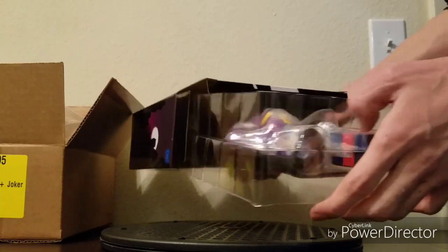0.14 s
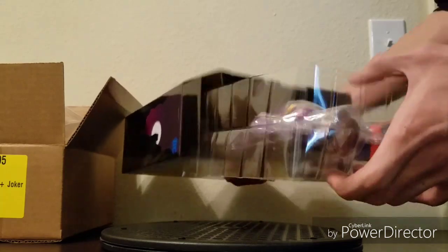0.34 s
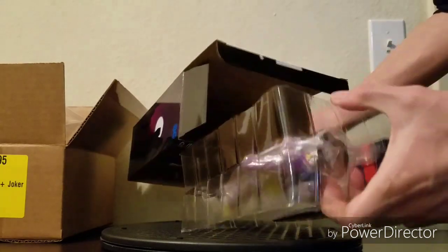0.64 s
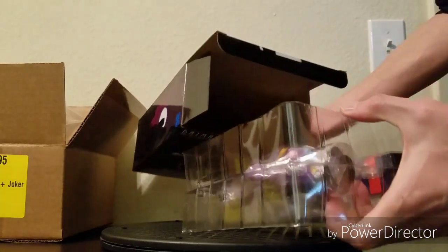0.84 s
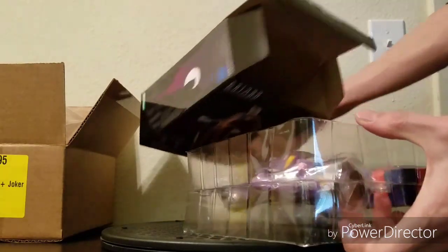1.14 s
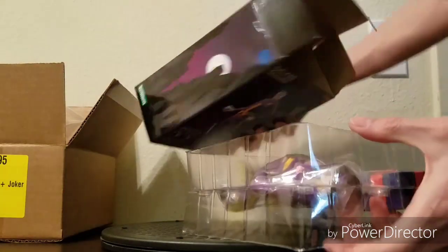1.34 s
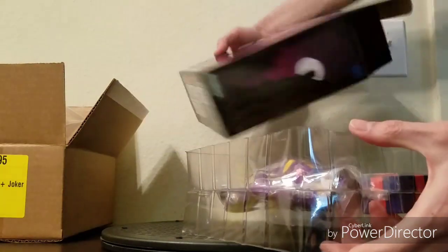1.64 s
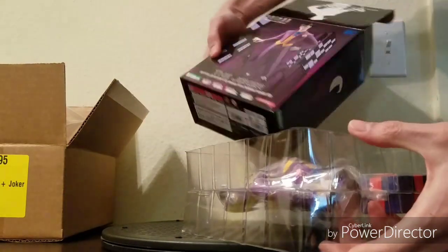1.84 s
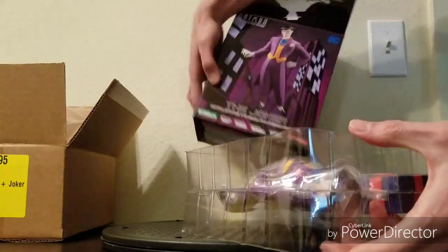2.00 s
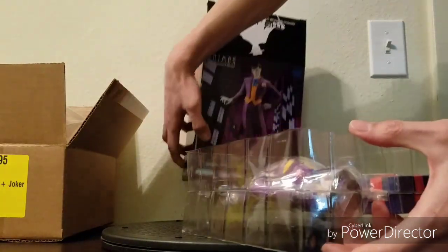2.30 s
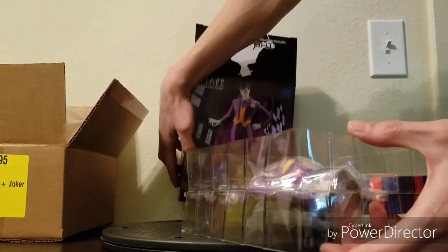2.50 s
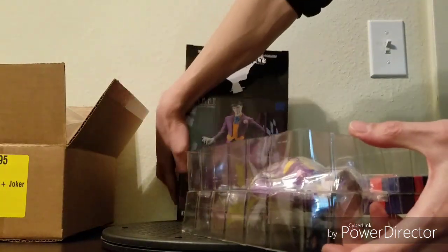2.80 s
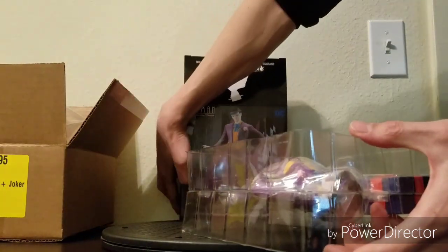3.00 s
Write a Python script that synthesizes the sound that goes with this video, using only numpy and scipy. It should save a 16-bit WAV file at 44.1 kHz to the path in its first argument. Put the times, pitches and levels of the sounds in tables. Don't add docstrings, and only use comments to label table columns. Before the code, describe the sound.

A thin plastic tray slides from a cardboard box, scraping with a low hollow boom and scattered snaps from 0 s, a loud pop near 0.34, and a dense crackling rush at 0.43-0.8. Faint creaks and hand rubs follow, with single ringing pops at 1.25, 1.63, 1.79 and 2.02. Hollow cardboard knocks land around 2.43, 2.73 and 2.96. Close microphone, short room echo, quiet hum.

```python
import sys
import numpy as np
from scipy import signal
from scipy.fft import rfft, irfft, next_fast_len
from scipy.io import wavfile
from scipy.ndimage import uniform_filter1d, map_coordinates

SR = 44100
rng = np.random.default_rng(int(sys.argv[2]) if len(sys.argv) > 2 else 0)


def log_audio(samples):
    frames = np.atleast_2d(samples).T
    limited = np.clip(frames, -1, 1)
    pcm = np.round(limited * 32767).astype(np.int16)
    wavfile.write(sys.argv[1], SR, pcm)


def makeup_ratio(level_db):
    decades = np.asarray(level_db, float) / 20
    return 10 ** decades


N = 138915

# (frequency [Hz], level [dB])
HUM_COLOUR = [(15, -18.5), (25, -20), (49, -4.5), (124, 7), (202, -3), (566, -9.5), (9000, -30.5),
              (14700, -23), (16400, -46.5)]
# (frequency [Hz], time to fall 60 dB [s])
ROOM_T60 = [(100, 0.23), (600, 0.31), (3000, 0.31), (14000, 0.29)]
# (frequency [Hz], width [Hz], level [dB])
NOOK_MODES = [(1596, 46, 3), (135, 24, 6)]
# (frequency [Hz], left over right [dB])
LEFT_OVER_RIGHT = [(25, 8), (400, 1.6), (3000, -2.2), (5500, -6), (9000, 3), (15000, 3.2)]
# (frequency [Hz], unlike part [dB])
UNLIKE_PART = [(60, -22.5), (500, -20), (2000, -16), (6000, -7), (15000, -8.5)]
# (middle [s], half length [s], level [dB], bright over dull [dB])
HAND_RUBS = [
    (1.009, 0.16, -66.5, 6.5),
    (1.111, 0.044, -61, 8),
    (1.439, 0.014, -54.5, 5),
    (2.256, 0.03, -54.5, -0.5),
    (2.612, 0.0273, -75, 12),
    (3.1, 0.14, -59.5, 0),
]
# (time [s], scrape level [dB])
SCRAPE_LEVEL = [(0, -31.5), (0.088, -35.5), (0.189, -30), (.26, -34.5), (0.324, -38.5), (.35, -29.5),
                (0.419, -31.5), (0.461, -27.5), (0.522, -33), (.57, -25.5), (.6, -30.5), (.65, -42.5),
                (.7, -39), (0.755, -44.5), (0.812, -38.5), (.88, -90)]
# (frequency [Hz], level [dB per Hz])
SCRAPE_COLOUR = [(40, -25.5), (300, 2.5), (600, 3), (2500, -7), (3300, -13.5), (7500, -21.5), (9000, -28),
                 (13500, -26)]
# (time [s], peak [dB], ring [Hz])
BOX_KNOCKS = [(0.346, -20.5, 135), (0.383, -30, 128), (.437, -18.5, 130.7), (.46, -23.5, 138.4),
              (0.488, -36, 81), (0.252, -37, 120), (.72, -42.5, 61), (0.612, -28, 135), (1.172, -41, 310),
              (1.503, -58.5, 125), (2.206, -45.5, 500), (2.218, -36.5, 398), (2.247, -37, 501),
              (2.258, -43, 674), (2.424, -25, 434), (2.428, -28, 251), (2.44, -30.5, 206),
              (2.572, -47, 582), (2.6, -46.5, 475), (2.727, -19.5, 533), (2.731, -33, 131),
              (2.743, -26.5, 516), (2.953, -31.5, 508), (2.961, -21.5, 221), (2.992, -26, 666),
              (3.134, -45, 392)]
# (frequency [Hz], mode strength [dB])
BOX_BODY = [(47, -40), (80, -15), (211, -8.5), (509, -4.5), (1470, -21.5), (2700, -30), (3000, -42),
            (3900, -58.5), (6600, -120)]
# (frequency [Hz], mode strength [dB])
TRAY_BODY = [(88, -45), (190, -14.5), (300, -6.5), (680, -4.5), (824, -10.5), (932, -8.5), (4000, -12),
             (5200, -59.5), (8800, -120)]
# (frequency [Hz], level [dB per Hz])
CRACK_COLOUR = [(1500, -3.5), (2500, 3), (3200, -16.5), (4400, -10), (7500, -13.5), (9500, -24),
                (13000, -20), (16400, -30.5)]
# (time [s], peak [dB], ring [Hz], crack over ring [dB], buckling time [ms])
RUSH_SNAPS = [(0.091, -27.5, 1010, -18.5, 2.7), (.129, -24.5, 1070, -14.5, 0.83),
              (0.237, -16.5, 1052, -6.5, 2.9), (0.285, -28, 1500, -13, 4.1), (0.337, -23, 2120, -7.5, 6.7),
              (0.43, -14, 757, -25, 2.3), (0.444, -14.5, 525, -29.5, 3.83), (0.462, -15, 493, -11.5, 4.3),
              (0.48, -17.5, 810, -18, 6.5), (.487, -13.5, 855, -17, 3.6), (0.492, -12, 1815, -11, 6.8),
              (.508, -24.5, 770, -12.5, 3.6), (0.528, -16, 2290, -6.5, 2.24), (0.53, -9, 1780, -13, 7),
              (.547, -25, 800, -20, 2.8), (0.557, -16, 1330, -24, 4), (.568, -10.5, 570, -29, 4.54),
              (0.578, -15.5, 590, -24, 3), (.588, -19, 1200, -23, 4.4), (0.603, -8.5, 1040, -21.5, 4.6),
              (0.612, -7, 556, -18, 3), (0.619, -11, 1653, -8.5, 6), (0.634, -22.5, 2400, -24, 3.6),
              (0.646, -16.5, 2500, -24.5, 3.3), (0.656, -21.5, 2370, -21, 4), (0.667, -10, 882, -16, 4),
              (.677, -24.5, 1000, -13.5, 2.6), (0.703, -35.5, 810, -15, 0.68),
              (0.714, -23.5, 2070, -19.5, 1.93), (0.732, -23, 1076, -17.5, 2.5),
              (0.768, -26.5, 1930, -14, 1.3), (0.775, -20.5, 329, -13.5, 1.66),
              (0.783, -17, 1070, -20, 2.8), (0.804, -19.5, 997, -14, 2.86)]
# (time [s], peak [dB], ring [Hz], crack over ring [dB])
SETTLING_SNAPS = [(0.922, -31.5, 296, -3.5), (0.992, -30.5, 783, -6.5), (1.061, -40, 530, -30),
                  (1.107, -63, 885, -20), (1.167, -40.5, 352, -36), (1.38, -39.5, 797, -15),
                  (1.43, -42, 490, -17), (1.477, -52, 358, -8), (1.545, -30, 836, -21),
                  (2.368, -46.5, 718, -29), (2.53, -63.5, 470, 1), (2.749, -23.5, 1640, -19),
                  (2.736, -29, 2300, -22), (2.95, -31.5, 323, -14), (3.038, -34.5, 444, -13)]
# (time [s], peak [dB], ring [Hz], crack over ring [dB])
CREAKS = [
    (.918, -31.5, 1043, -27),
    (1.236, -42, 780, -31),
    (1.621, -37.5, 756, -32.5),
    (2.009, -38.5, 560, -35),
]
# (time [s], peak [dB], crack over ring [dB])
PANEL_POPS = [
    (.342, -3, -18),
    (.345, -3.5, -32),
    (.437, -8.5, -36),
    (1.253, -17, -12.5),
    (1.632, -11, -19),
    (1.792, -9.5, -16.5),
    (2.017, -11, -19),
]
# (frequency [Hz], level [dB])
PANEL_RINGS = [
    [(390, 7), (554, 8), (1015, -0.5), (1700, 3.5)],
    [(320, 6), (560, 9), (1040, 4.5)],
    [(530, 13.5), (750, 3.5), (1340, 3)],
    [(560, -3.5), (834, 4.5), (1520, 0), (2300, 1.5), (4570, -3), (5400, -6)],
    [(290, 4.5), (813, 8.5), (1760, 9.5), (2080, 2), (2390, 2), (4250, 7)],
    [(275, -1.5), (813, 7), (1400, -2.5), (2070, 2), (2430, -9), (4250, 16), (5300, -11)],
    [(330, -4), (1030, 8.5), (1580, 3.5), (1940, -1.5), (2610, -4), (3310, -4), (4300, 12.5)],
]

SLIPS, SLIP_FADE_DB, RING_LAG_S = 9, 10, .001
MODES_PER_BLOW, LEAD_T60_S = 36, 0.048
TRAY_T60_S, BOX_T60_S = .03, .045
PANEL_BUCKLE_S, SMALL_BUCKLE_S = 0.0035, .002
CRACK_LASTS = 1.89
KNOCK_S, CRISP_KNOCK_S, CRISP_AFTER_S = 0.01291, 0.0051, 2.9
KNOCK_SOFT_S, BOOM_BELOW_HZ = 0.00062, 160
GRAINS_PER_S, GRAIN_SPREAD_DB, GRIT_DB, PATCHY_DB = 700, 4, -1, 4
BOOM_HZ, BOOM_WIDTH_HZ, BOOM_GAIN = 135, 52, 0.99
SCATTER_ABOVE_HZ, SCATTER_DB = 1320, 3
ROOM_DB, ROOM_DELAY_S, HUM_DB = -6.5, .005, -62
TOP_HZ, CEILING, KNEE = 15900, .8, 4


def unit(x):
    return x / np.sqrt(np.mean(x ** 2) + 1e-20)


def along(points, hz):
    f, v = np.transpose(points)
    return np.interp(np.log(hz + 1), np.log(f + 1), v)


def filtered(x, response):
    m = next_fast_len(x.shape[-1] + 8192)
    gain = response(np.fft.rfftfreq(m, 1 / SR))
    return irfft(rfft(x, m) * gain, m)[..., :x.shape[-1]]


def wobble(rate):
    knots = rng.standard_normal(int(N * rate / SR) + 4)
    return map_coordinates(knots, [np.arange(N) * rate / SR])


def resonances(f, modes):
    total = 0
    for k, (hz, width, db) in enumerate(modes):
        drag = 1j * f * width
        total = total + (-1) ** k * makeup_ratio(db) * drag / (hz * hz - f * f + drag)
    return total


def mode_width(hz, t60, power):
    return np.log(1000) / np.pi / t60 * (hz / 500) ** power


def scattered(x, size):
    z = signal.stft(x, nperseg=size)[2]
    turned = z * np.exp(2j * np.pi * rng.random(z.shape))
    return signal.istft(turned, nperseg=size)[1][:N]


def hum():
    noise = rng.standard_normal((2, N))
    middle, side = filtered(noise, lambda f: makeup_ratio(along(HUM_COLOUR, f)) * (f < 16500))
    side = filtered(side, lambda f: makeup_ratio(along([(100, -9.0), (1000, 2.5), (5000, 0.0)], f)))
    level = makeup_ratio(HUM_DB + 0.5 * wobble(6.02))
    return level * unit(np.array([middle + side, middle - side]))


def room(x):
    out, step = np.zeros((2, N + SR)), SR // 6
    for start in range(0, N, step):
        hz, t, z = signal.stft(rng.standard_normal((2, SR // 2)), SR, nperseg=256)
        alike = np.clip(along([(100, 0.78), (700, 0.39), (3000, 0.097)], hz), 0, 1)[:, None]
        z[1] = alike * z[0] + np.sqrt(1 - alike ** 2) * z[1]
        fade = makeup_ratio(-60 * t / along(ROOM_T60, hz)[:, None])
        tail = signal.istft(z * fade, SR, nperseg=256)[1]
        tail = tail / np.linalg.norm(tail[0])
        wet = signal.fftconvolve(x[None, start:start + step], tail, axes=1)
        out[:, start + round(ROOM_DELAY_S * SR):][:, :wet.shape[1]] += wet
    return filtered(out[:, :N], lambda f: 1 + abs(resonances(f, NOOK_MODES)))


def ports(x):
    unlike = filtered(3.2 * scattered(x, size=128), lambda f: makeup_ratio(along(UNLIKE_PART, f)))
    return x + np.array([unlike, -unlike])


def rubbing():
    hit, size, sign = rng.random((3, N))
    grain_size = makeup_ratio(-GRAIN_SPREAD_DB * np.log(size + 1e-2))
    grains = unit((hit < GRAINS_PER_S / SR) * grain_size * np.sign(sign - .5))
    z = signal.stft(makeup_ratio(GRIT_DB) * grains + rng.standard_normal(N), nperseg=256)[2]
    patches = uniform_filter1d(rng.standard_normal(z.shape), 3, 0)
    patches = uniform_filter1d(patches, 7, 1)
    return signal.istft(z * makeup_ratio(PATCHY_DB * unit(patches)), nperseg=256)[1][:N]


def scrape_colour(f):
    return makeup_ratio(along(SCRAPE_COLOUR, f)) * (f < 15700) * (f > 40)


def hand_rubs():
    t = np.arange(N) / SR
    skin = unit(filtered(rubbing(), lambda f: scrape_colour(f) * (f > 300)))
    dull = filtered(skin, lambda f: 1 / (1 + (f / 3000) ** 4))
    out = np.zeros(N)
    for middle, half, db, bright_db in HAND_RUBS:
        swell = np.exp(-((t - middle) / half) ** 2)
        out += makeup_ratio(db) * swell * (dull + makeup_ratio(bright_db) * (skin - dull))
    return out


def slide():
    boom = [(BOOM_HZ, BOOM_WIDTH_HZ, 0)]
    drag = filtered(rubbing(), lambda f: scrape_colour(f) * (1 + BOOM_GAIN * resonances(f, boom)))
    s, db = np.transpose(SCRAPE_LEVEL)
    level_db = np.interp(np.arange(N) / SR, s, db, right=-120)
    return makeup_ratio(level_db + wobble(22.0)) * unit(drag)


def slip_pushes(t, length_s, soft_s):
    when, size = rng.random((2, SLIPS))
    when[0] = 0
    pushes = []
    for k, (w, s) in enumerate(zip(when, size)):
        middle = RING_LAG_S + soft_s + w * length_s
        bump = np.exp(-.5 * ((t - middle) / (soft_s / 3)) ** 2)
        pushes.append((-1) ** k * makeup_ratio(-SLIP_FADE_DB * (w + s)) * bump)
    return pushes


def crack_noise(t, length_s):
    flutter = makeup_ratio(2.7 * rng.standard_normal(len(t) // 40 + 1).repeat(40)[:len(t)])
    fade = np.clip(t / 0.00058, 0, 1) * np.exp(-(t / (CRACK_LASTS * length_s)) ** 2)
    burst = rng.standard_normal(len(t)) * fade * flutter
    return filtered(burst, lambda f: makeup_ratio(along(CRACK_COLOUR, f)) * (f > 1500) * (f < 16500))


def blow(body, notes, t60, crack_db, length_s, soft_s):
    t = np.arange(SR // 8) / SR
    pushes = slip_pushes(t, length_s, soft_s)
    first = pushes[0] / pushes[0].max()
    place, chance = rng.random(MODES_PER_BLOW), rng.standard_normal(MODES_PER_BLOW)
    low, high = body[1][0], body[-1][0]
    mode_hz = low * (high / low) ** ((np.arange(MODES_PER_BLOW) + place) / MODES_PER_BLOW)
    modes = [(hz, mode_width(hz, t60, .5), along(body, hz) + 2.1 * luck) for hz, luck in zip(mode_hz, chance)]
    leads = [(hz, mode_width(hz, LEAD_T60_S, 0.49), db) for hz, db in notes]
    ring = filtered(sum(pushes), lambda f: resonances(f, modes))
    ring = ring + filtered(first, lambda f: resonances(f, leads))
    crack = crack_noise(t, length_s)
    return ring / abs(ring).max() + makeup_ratio(crack_db) * crack / abs(crack).max()


def knocks():
    out = np.zeros(N + SR)
    for s, db, hz in BOX_KNOCKS:
        notes = [(hz, 9 if hz < BOOM_BELOW_HZ else 1.5)]
        length_s = KNOCK_S if s < CRISP_AFTER_S else CRISP_KNOCK_S
        thud = blow(BOX_BODY, notes, BOX_T60_S, -25.5, length_s, KNOCK_SOFT_S)
        out[round((s - RING_LAG_S) * SR):][:len(thud)] += makeup_ratio(db) * thud
    return out[:N]


def snaps():
    rows = [(s, db, [(hz, 3)], crack_db, ms / 1000) for s, db, hz, crack_db, ms in RUSH_SNAPS]
    for s, db, hz, crack_db in SETTLING_SNAPS + CREAKS:
        rows.append((s, db, [(hz, -1.5)], crack_db, SMALL_BUCKLE_S))
    for (s, db, crack_db), notes in zip(PANEL_POPS, PANEL_RINGS):
        rows.append((s, db, notes, crack_db, PANEL_BUCKLE_S))
    out = np.zeros(N + SR)
    for s, db, notes, crack_db, length_s in rows:
        pop = blow(TRAY_BODY, notes, TRAY_T60_S, crack_db + 9.5, length_s, soft_s=0.00029)
        out[round((s - RING_LAG_S) * SR):][:len(pop)] += makeup_ratio(db - 2) * pop
    return out[:N]


def scene():
    near = snaps() + knocks() + slide() + hand_rubs()
    plain = lambda f: 1 / (1 + (f / SCATTER_ABOVE_HZ) ** 2)
    rough = makeup_ratio(SCATTER_DB) * scattered(near, size=64)
    sent = filtered(near, plain) + filtered(rough, lambda f: 1 - plain(f))
    return ports(near) + makeup_ratio(ROOM_DB) * room(sent) + hum()


def low_pass(x):
    return signal.sosfilt(signal.butter(12, 16500, fs=SR, output="sos"), x)


def record(dry):
    sides = np.array([[.5], [-.5]])
    x = filtered(dry, lambda f: makeup_ratio(sides * along(LEFT_OVER_RIGHT, f)) * (f < TOP_HZ))
    x = x / (1 + abs(x / CEILING) ** KNEE) ** (1 / KNEE)
    return low_pass(x)


dry = scene()
out = record(dry)
log_audio(out)
```